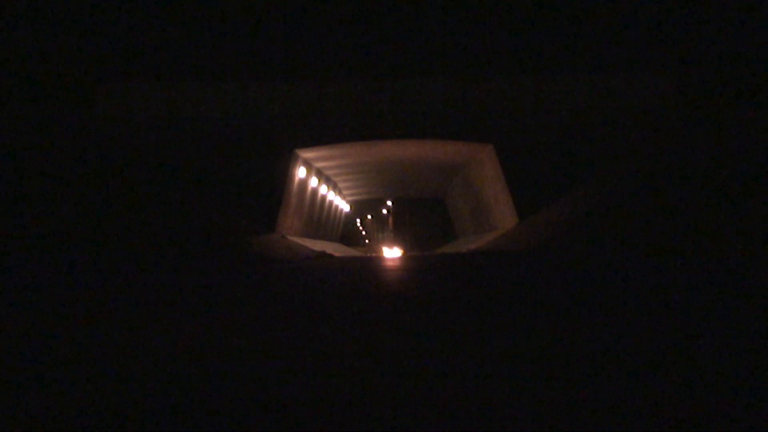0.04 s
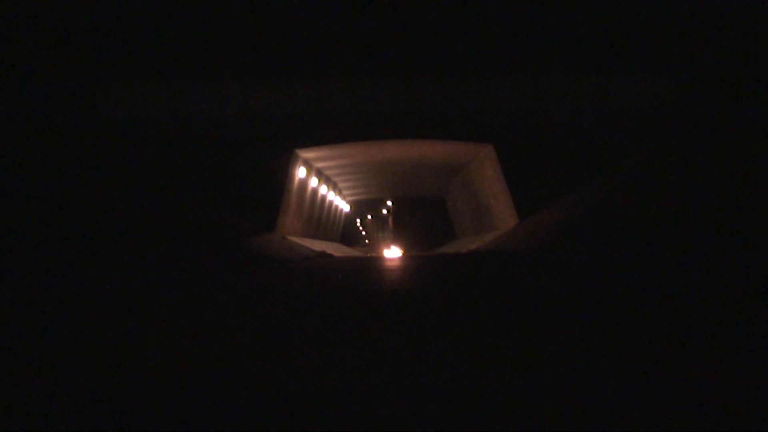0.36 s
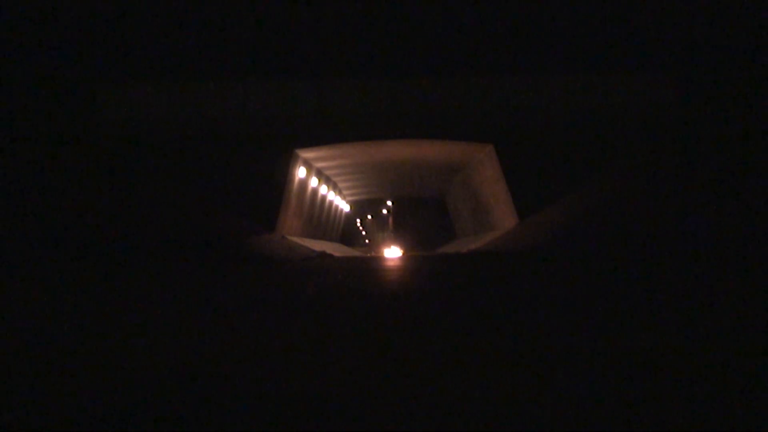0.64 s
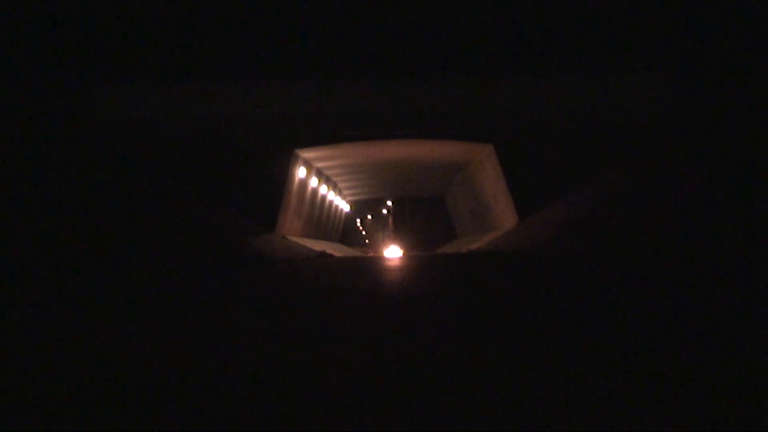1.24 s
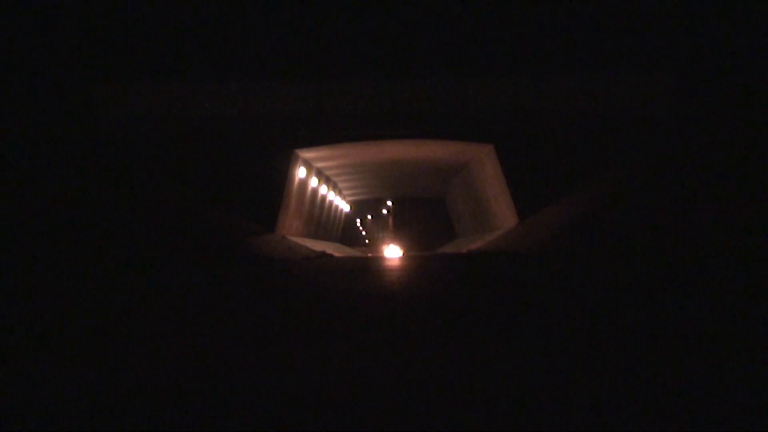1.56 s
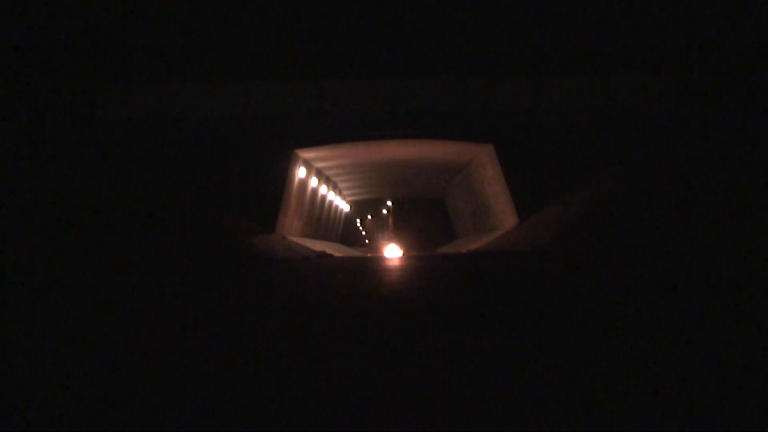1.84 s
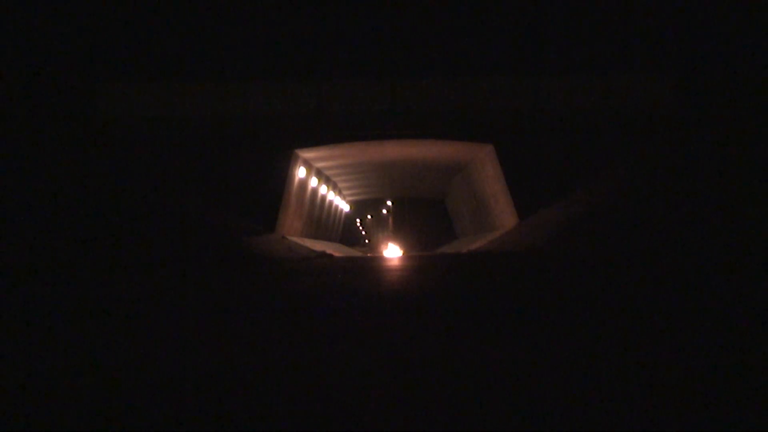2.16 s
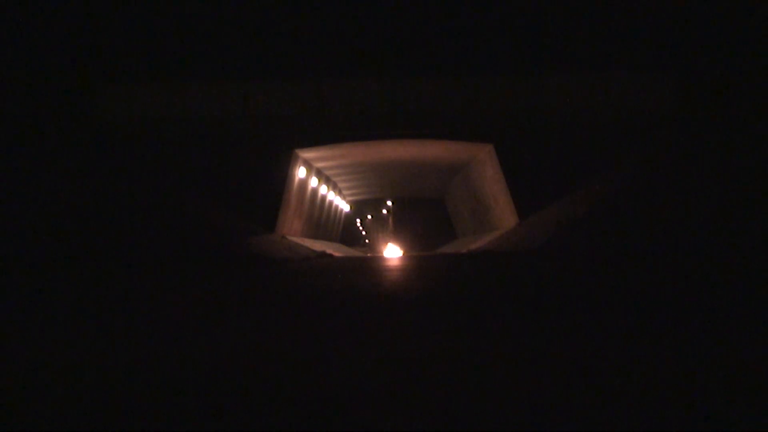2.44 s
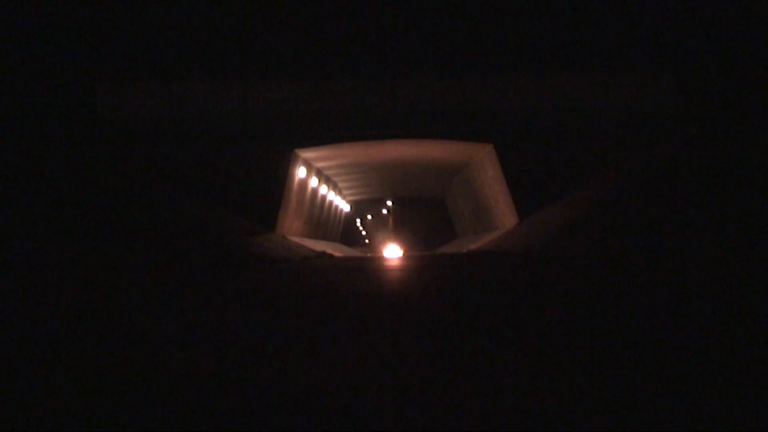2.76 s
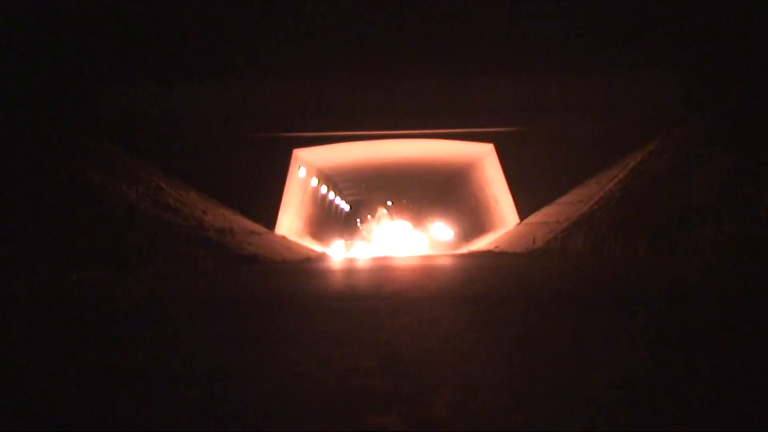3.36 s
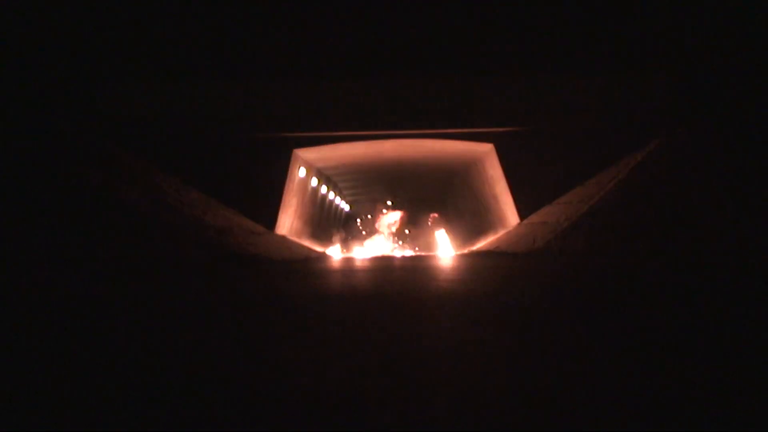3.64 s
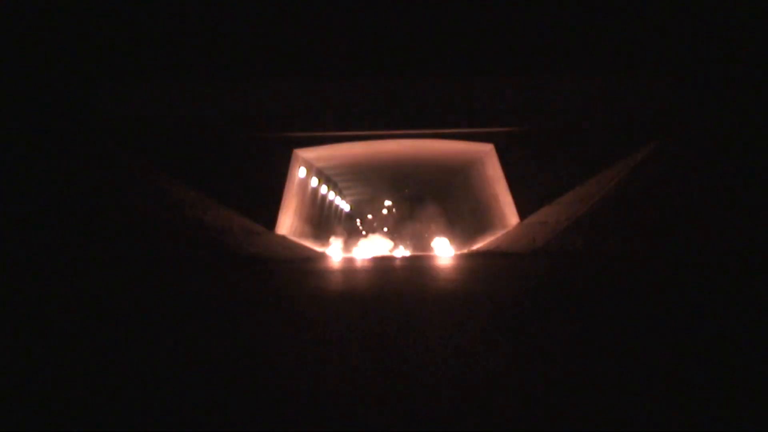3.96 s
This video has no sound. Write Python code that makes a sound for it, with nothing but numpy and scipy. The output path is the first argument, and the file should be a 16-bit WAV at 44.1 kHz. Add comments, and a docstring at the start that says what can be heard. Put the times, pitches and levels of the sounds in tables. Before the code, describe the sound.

An explosion in a concrete underpass is heard from outside. For three seconds there is only faint night hiss and hum, with a distant rumble around 2 seconds. At about 3.05 seconds a brief low thump leads into a very loud blast, overloading the microphone into harsh crackle until 3.5. A deep, fluttering roar follows, with dull echoing knocks and a faint sizzle, still booming at 4 seconds.

```python
"""A concrete underpass on a quiet night, heard from outside its mouth: a bag of gas explodes within.
A thump runs ahead through the ground; then the shock and its wall echoes overload the microphone
into a harsh crackle. The tunnel goes on roaring and booming, and at first its deep boom chokes
the roar once in every cycle. Dull knocks come back from the depths and burning scraps sizzle."""
import sys
import numpy as np
from scipy import signal
from scipy.fft import rfft, irfft
from scipy.io import wavfile
from scipy.ndimage import uniform_filter1d

SR = 44100
rng = np.random.default_rng(int(sys.argv[2]) if len(sys.argv) > 2 else 0)


def wrap_up_sound(samples):
    """Save the sound to the file named by the first command line argument, as 16-bit audio."""
    columns = np.atleast_2d(samples).T
    # keep every value between -1 and 1, then stretch to whole-number steps
    tamed = np.clip(columns, -1, 1)
    steps = np.round(tamed * 32767).astype(np.int16)
    wavfile.write(sys.argv[1], SR, steps)


N = 176400
T = np.arange(N) / SR
SHOCK_S, BLAST_END_S = 3.0565, 3.53

# Shock echoes off the walls. Each row: peak time in seconds, drive into the overload in dB.
WALL_ECHOES = [(3.0616, 5), (3.067, 5), (3.0736, -4), (3.077, 12.5), (3.09, -8), (3.099, 13), (3.1039, 19),
               (3.1117, 12), (3.1187, 5), (3.131, 23), (3.1444, 18), (3.1521, -5), (3.1668, 3), (3.175, -7),
               (3.194, -4.5), (3.2021, 5), (3.2085, 16), (3.2141, 2), (3.2215, 3), (3.2428, -3),
               (3.2481, 0), (3.2607, 7.5), (3.278, -7), (3.3041, 17), (3.3119, 7), (3.3205, -15),
               (3.3353, 5), (3.3528, 8), (3.3641, 7), (3.3682, 17), (3.3782, 6), (3.382, 6)]
# The shock front and last overloads. Each row: start in seconds, relative level in dB, left bias in dB.
LONE_CRACKS = [(3.0564, -9, 11.5), (3.3111, -9.5, -7), (3.3195, -10, 2), (3.3521, -9.5, 7), (3.377, -12, 4),
               (3.3938, -7, 3), (3.4428, -14.5, 10), (3.4583, -14.5, -20), (3.4754, -16.5, 4),
               (3.509, -14.5, -11)]
# Late echoes. Each row: peak time in seconds, level in dB.
LATE_KNOCKS = [(3.611, -22.5), (3.657, -22.5), (3.7171, -18.5), (3.754, -22.5), (3.825, -21), (3.898, -21),
               (3.943, -25.5)]
# Tunnel resonances. Each row: peak time in seconds, pitch in Hz, level in dB, half length in seconds.
HOLLOW_SWELLS = [(3.559, 395.3, -35.5, .012), (3.626, 366, -26.5, 0.0079), (3.717, 84, -35.5, 0.02),
                 (3.901, 287, -32, 0.024), (3.932, 323.7, -32, 0.012), (3.967, 315, -34, 0.007)]
# Steady night tones. Each row: pitch in Hz, level before the shock in dB.
HUM_TONES = [(554.5, -79.5), (839.8, -73)]
# Faint high chirps. Each row: peak time in seconds, level in dB, half length in seconds.
NIGHT_CHIRPS = [(.062, -84, 0.049), (1.787, -79, .02), (2.138, -88, 0.058)]

# Tone colours of the layers. Each row: frequency in Hz, relative level in dB.
EARLY_PRESSURE_EQ = [(30, 3), (200, 6.5), (900, -0.5), (2500, -5.5), (6000, -11), (16000, -33)]
LATE_PRESSURE_EQ = [(30, -2.5), (200, 2), (500, 1.5), (1000, -8), (2500, -19), (6000, -31), (16000, -60)]
OVERLOAD_EQ = [(20, -21), (60, -13.5), (150, -11.5), (400, -6.5), (850, -1), (1800, 1.5), (4500, 1),
               (8000, 1.5), (16000, 6.5)]
TEAR_EQ = [(700, 0), (3000, -11.5), (16000, -17)]
SURGE_EQ = [(50, -25), (160, 0.5), (480, 0.5), (900, -24), (8000, -77)]
ROAR_EQ = [(25, -31), (48, -21), (85, -0.5), (130, 2), (180, -4), (270, 1), (350, -1), (500, -4),
           (750, -9.5), (1000, -14.5), (1400, -19.5), (3000, -27.5), (5000, -39.5), (8500, -55.5),
           (11500, -76), (16000, -90)]
WALL_SMEAR_EQ = [(900, 7), (16000, -72)]
SIZZLE_EQ = [(5000, -10), (11000, 1), (16000, -17)]
AIR_EQ = [(15, -32), (28, -10), (45, -3.5), (75, -9.5), (110, -4.5), (155, -8), (195, -7), (330, -9),
          (600, -9), (950, -11), (2000, -16.5), (6000, -27.5), (10800, -32.5), (11800, -29), (16500, -33.5)]

# Fader moves of the layers. Each row: time in seconds, relative level in dB.
BLAST_FADER = [(3.058, -26), (3.09, -24), (3.13, -24.5), (3.2, -23), (3.235, -26.5), (3.28, -25.5),
               (3.31, -26.5), (3.34, -28.5), (3.38, -25), (3.405, -44.5), (3.53, -47.5)]
SURGE_FADER = [(3.06, -49), (3.2, -36), (3.29, -30.5), (3.355, -30), (3.41, -44)]
ROAR_BODY_FADER = [(3.39, -31), (3.41, -32), (3.51, -32), (3.524, -35.5), (3.558, -28.5), (3.864, -33),
                   (3.99, -30.5)]
ROAR_TREBLE_FADER = [(3.37, -48), (3.396, -32), (3.462, -38.5), (3.466, -38.5), (3.646, -33.5),
                     (3.7, -39.5), (3.714, -36), (3.768, -39.5), (3.83, -37.5), (3.838, -43), (3.99, -36.5)]
BOOM_FADER = [(3.06, -58), (3.36, -46), (3.41, -34.5), (3.5, -41), (3.6, -46), (3.72, -38), (3.79, -44),
              (3.88, -37), (4, -41)]
RUMBLE_FADER = [(0, -92), (1.55, -87), (1.7, -74), (2.05, -66.5), (2.3, -66), (2.5, -78), (3, -79)]
# How hard the boom chokes the roar. Each row: time in seconds, depth from 0 to 1.
CHOKE_DEPTH = [(3.38, 1), (3.52, 0.48), (3.57, 0.18), (3.8, 0.085), (4, 0.07)]
# Stereo spread of the roar's treble. Each row: time in seconds, side gain in dB.
TREBLE_WIDTH = [(3.35, -13), (3.45, 18), (3.51, -4), (3.56, 4)]

# Stereo images of the noises. Each row: frequency in Hz, left-right likeness from 0 (wide) to 1 (mono).
BLAST_IMAGE = [(100, 0.98), (1000, 0.85), (8000, 1)]
ROAR_IMAGE = [(60, 0.43), (180, 0.9), (400, 0.85), (1000, 0.95), (6000, 0.97), (10000, 0.79)]
AIR_IMAGE = [(100, 0.96), (200, 0.88), (350, 0.58), (700, 0.36), (1400, 0.05), (3000, 0), (6000, 0.22),
             (10000, 0.42)]


def blast():
    """Pressure pins the microphone to one side; echoes slam it across and back, ever less sharply."""
    blunting_s, echo_width_s = 0.14, 0.0013
    hardness, pin_offset = 2.9, 0.57
    sharpness = np.exp(-np.maximum(T - SHOCK_S, 0) / blunting_s)
    pressure = sharpness * noise(EARLY_PRESSURE_EQ, BLAST_IMAGE)
    pressure += np.sqrt(1 - sharpness ** 2) * noise(LATE_PRESSURE_EQ, BLAST_IMAGE)
    echoes = sum(amp(db) / (1 + ((T - s) / echo_width_s) ** 4) for s, db in WALL_ECHOES)
    scatter = amp(-8 + 5.4 * wander(rate_hz=390)) * (T > WALL_ECHOES[0][0])
    drive = pressure * (echoes + scatter)
    pinned = np.tanh(hardness * (drive - pin_offset)) + 0.16 * drive
    crackle = equalise(cut(pinned, 35, "highpass"), OVERLOAD_EQ)
    power = uniform_filter1d((crackle ** 2).mean(0), size=2600)
    levelled = crackle / np.sqrt(abs(power) + 1e-6)
    return levelled * amp(curve(BLAST_FADER)) * (T > SHOCK_S) * (T < BLAST_END_S)


def cracks():
    """Lone steep pressure jumps that fall back at once, each with a short tearing noise."""
    snap_s, tear_s = 0.00023, 0.00056
    out = np.zeros((2, N))
    tear = amp(-9.5) * noise(TEAR_EQ, ROAR_IMAGE)
    for start, db, pan_db in LONE_CRACKS:
        age = np.maximum(T - start, 0)
        crack = np.exp(-age / snap_s) + tear * np.exp(-age / tear_s)
        out -= amp(db) * pan(pan_db) * crack * (T > start)
    return cut(cut(out, 130, "highpass", order=1), 7600, "lowpass", order=1)


def gas_surge():
    """The heavy low roar of the burning gas, building behind the crackle."""
    gate = (T > SHOCK_S) * (T < SURGE_FADER[-1][0])
    return noise(SURGE_EQ, ROAR_IMAGE) * amp(curve(SURGE_FADER)) * gate


def tunnel_roar():
    """The tunnel's reverberation: a dark body under a fluttering treble."""
    split_hz = 766
    body = unit_rms(cut(noise(ROAR_EQ, ROAR_IMAGE), split_hz, "lowpass", order=4))
    treble = cut(noise(ROAR_EQ, ROAR_IMAGE), split_hz, "highpass", order=4)
    treble = unit_rms(treble * amp(2.24 * wander(rate_hz=260)))
    mid = treble.mean(0)
    treble = mid + (treble - mid) * amp(curve(TREBLE_WIDTH))
    return body * amp(curve(ROAR_BODY_FADER) + 1) + treble * amp(curve(ROAR_TREBLE_FADER) - 1)


def tunnel():
    """The tunnel's deep boom swells in with its roar and chokes it once a cycle."""
    boom_hz, rise_s = 62.12, 0.46
    release_s = 3.3945  # a trough of the boom, where it first swings free of the overload
    phase = running_phase(boom_hz + 0.85 * wander(rate_hz=6.6))
    swing = -np.cos(phase - np.interp(release_s, T, phase))
    choke = 1 - curve(CHOKE_DEPTH) * (.5 + .5 * np.tanh(8.8 * swing))
    choke /= np.sqrt(uniform_filter1d(choke ** 2, size=1400))  # make-up gain
    roar = tunnel_roar() * choke * pan(1.4)
    boom = np.sqrt(2) * swing * amp(curve(BOOM_FADER) + wander(rate_hz=7.4)) * pan(-3)
    return (roar + boom) * np.clip((T - SHOCK_S) / rise_s, 0, 1)


def late_echoes():
    """Dull knocks, smeared by the walls, and hollow swells come back from deep in the tunnel."""
    knock_hz, knock_half_s, smear_s = 720, .0007, 0.013
    out = np.zeros((2, N))
    smear = amp(-14) * noise(WALL_SMEAR_EQ, ROAR_IMAGE)
    for peak, db in LATE_KNOCKS:
        t = T - peak
        knock = bell(t, knock_half_s) * np.sin(2 * np.pi * knock_hz * rng.uniform(.9, 1.1) * t)
        out += amp(db) * (knock + smear * bell(t - smear_s, smear_s))
    drift_hz = 12 * wander(rate_hz=42.2)
    for peak, hz, db, half_s in HOLLOW_SWELLS:
        out += amp(db) * bell(T - peak, half_s) * tone(hz + drift_hz)
    return out * pan(2.4)


def ground_thump():
    """A low swell through the ground that ends as the shock arrives."""
    pitch_hz, rise_s, lead_s = 68.7, 0.014, 0.0146
    t = T - SHOCK_S + lead_s
    swell = np.exp(-np.hypot(t, .005) / rise_s * np.where(t < 0, 1, .5))  # falls half as fast
    sub = 2 * np.sin(2 * np.pi * pitch_hz * t)
    grit = 0.46 * noise([(100, -4.5), (400, -13), (1500, -29), (6000, -56)])
    return amp(-41) * swell * (sub + grit) * (T < SHOCK_S + .01)


def burning_scraps():
    """The scraps left burning sizzle in uneven spits that soon die down."""
    fade_db_per_s = 30
    fade = amp(-75.5 - fade_db_per_s * np.maximum(T - BLAST_END_S, 0)) * (T > SHOCK_S)
    return noise(SIZZLE_EQ) * fade * amp(6.5 * wander(rate_hz=27))


def night():
    """A bed of soft hiss, wavering hum and far rumble, ducked 7 dB from the shock on."""
    hum = sum(amp(db) * tone(hz + 1.38 * wander(rate_hz=9.5)) for hz, db in HUM_TONES)
    rumble = noise([(15, -11), (45, -13.5), (110, -20), (400, -58), (2000, -87)])
    rumble *= amp(curve(RUMBLE_FADER))
    air = amp(-64) * noise(AIR_EQ, AIR_IMAGE)
    return (air + hum + rumble) * np.where(T < SHOCK_S, 1, amp(-7))


def chirps():
    """A thin, rough tone that comes and goes at the edge of hearing."""
    swells = sum(amp(db) * bell(T - peak, half_s) for peak, db, half_s in NIGHT_CHIRPS)
    return tone(hz=2590 + 65 * wander(rate_hz=90)) * (amp(-87.5) + swells)


def amp(db):
    """Decibels to gain."""
    return 10 ** (np.asarray(db) / 20)


def pan(db):
    """Stereo gains with the left this many dB above the right."""
    return amp([[db / 2], [-db / 2]])


def unit_rms(x):
    """Scales to rms 1."""
    return x / np.sqrt(np.mean(x ** 2) + 1e-20)


def curve(points):
    """A time table joined by straight lines."""
    return np.interp(T, *np.transpose(points))


def bell(t, half_s):
    """A Gaussian swell peaking at t = 0."""
    return np.exp(-.5 * (t / half_s) ** 2)


def running_phase(hz):
    """Phase in radians of a moving pitch."""
    return 2 * np.pi * np.cumsum(hz) / SR


def tone(hz):
    """A sine of rms 1 on a moving pitch."""
    return np.sqrt(2) * np.sin(running_phase(hz))


def gains(eq, hz):
    """An EQ table as gains, joined on a log-frequency axis."""
    f, db = np.transpose(eq)
    return amp(np.interp(np.log(hz + 1), np.log(f + 1), db))


def noise(eq, image=((100, .95),)):
    """Noise of rms 1 with a given colour and stereo image."""
    hz = np.fft.rfftfreq(N, 1 / SR)
    f, likeness = np.transpose(image)
    shared = np.clip(np.interp(np.log(hz + 1), np.log(f), likeness), 0, 1)
    centre, left, right = rfft(rng.standard_normal((3, N))) * gains(eq, hz)
    return unit_rms(irfft(np.sqrt(shared) * centre + np.sqrt(1 - shared) * np.array([left, right]), N))


def wander(rate_hz):
    """Smooth random modulation of rms 1, up to a given rate."""
    rolloff = 1 + (np.fft.rfftfreq(N, 1 / SR) / rate_hz) ** 4
    return unit_rms(irfft(rfft(rng.standard_normal(N)) / rolloff, N))


def equalise(x, eq):
    """Minimum-phase EQ: nothing rings ahead of a hit."""
    log_gain = np.log(gains(eq, abs(np.fft.fftfreq(8192, 1 / SR))))
    taps = np.fft.ifft(np.exp(np.conj(signal.hilbert(log_gain)))).real[:4096]
    return signal.oaconvolve(x, taps[None])[:, :N]


def cut(x, hz, kind, order=2):
    """Butterworth filter."""
    return signal.sosfilt(signal.butter(order, hz, kind, fs=SR, output="sos"), x)


def scene():
    """The quiet night, then the explosion and its tail."""
    return (night() + chirps() + ground_thump() + blast() + gas_surge() + cracks()
            + tunnel() + late_echoes() + burning_scraps())


def record(dry):
    """The top octave narrows to mono, peaks are rounded off, and the very top is cut."""
    mono_above_hz, ceiling, top_hz = 11300, .42, 16700
    mid, side = dry.mean(0), (dry[0] - dry[1]) / 2
    side = signal.oaconvolve(side, signal.firwin(101, mono_above_hz, fs=SR), "same")
    rounded = ceiling * np.tanh(np.array([mid + side, mid - side]) / ceiling)
    high_cut = signal.firwin(511, top_hz, window=("kaiser", 9), fs=SR)
    return signal.oaconvolve(rounded, high_cut[None], "same")


dry = scene()
out = record(dry)
wrap_up_sound(out)
```